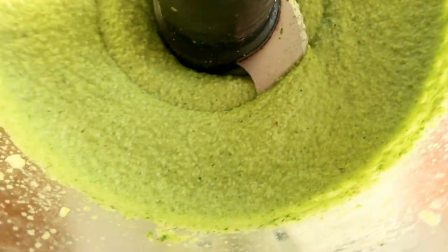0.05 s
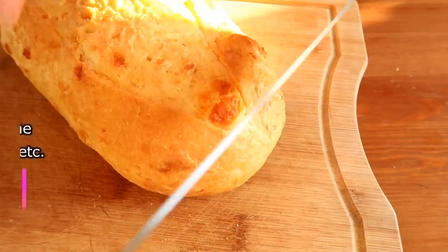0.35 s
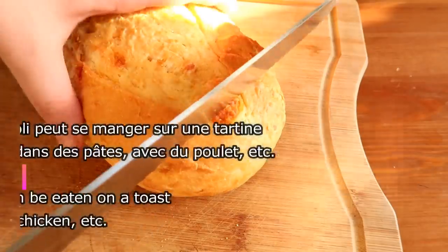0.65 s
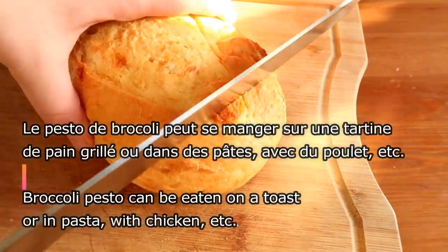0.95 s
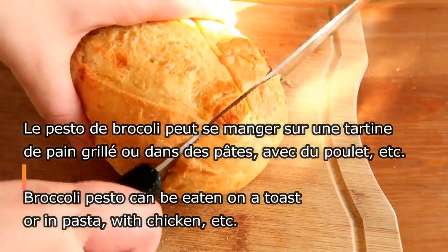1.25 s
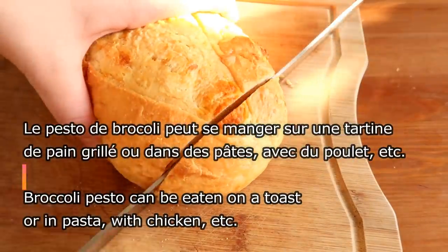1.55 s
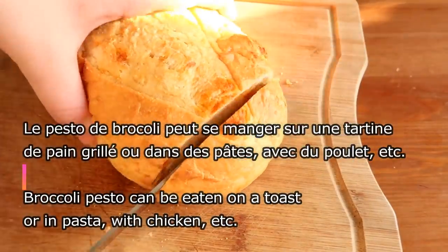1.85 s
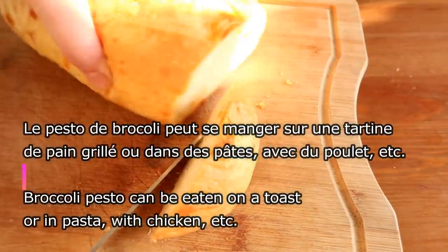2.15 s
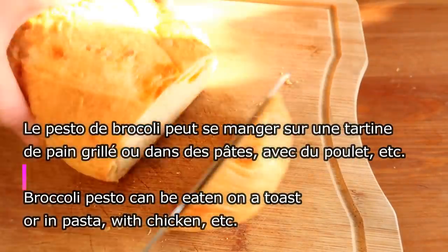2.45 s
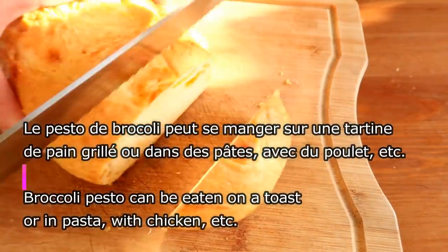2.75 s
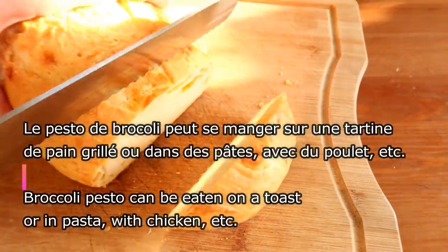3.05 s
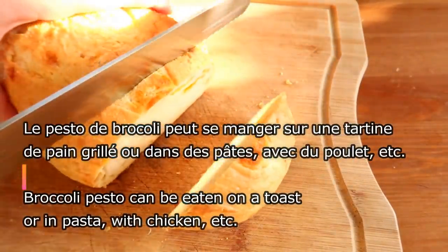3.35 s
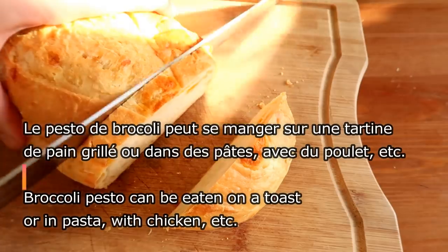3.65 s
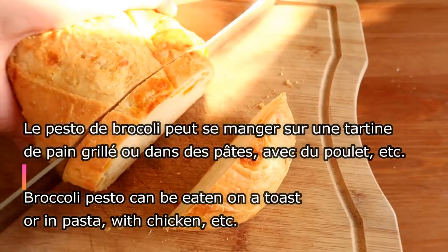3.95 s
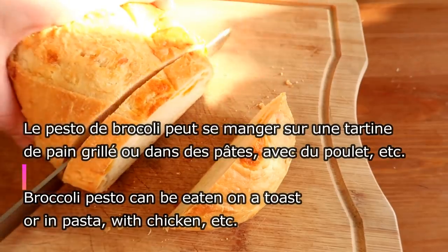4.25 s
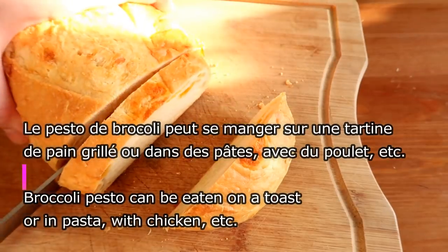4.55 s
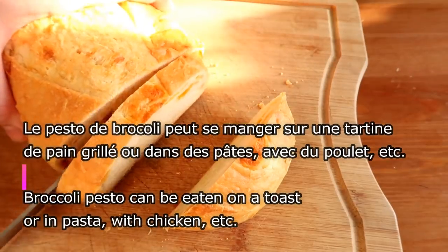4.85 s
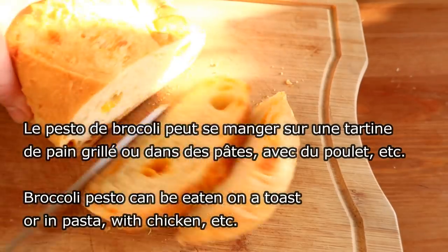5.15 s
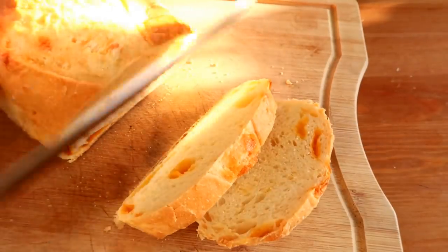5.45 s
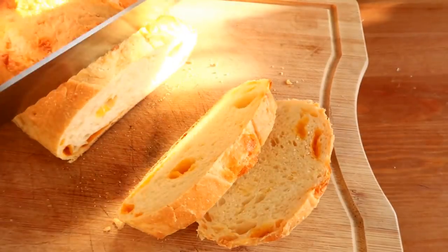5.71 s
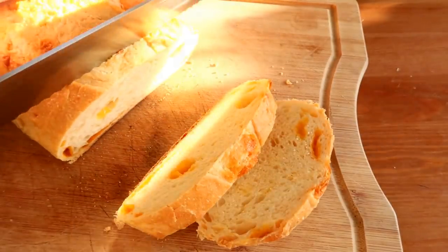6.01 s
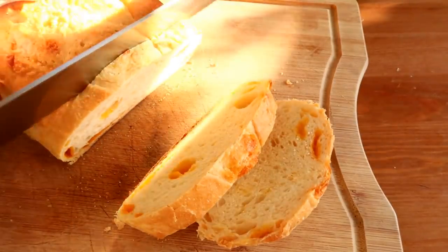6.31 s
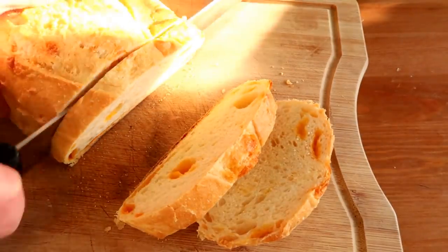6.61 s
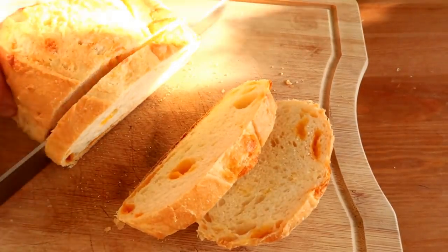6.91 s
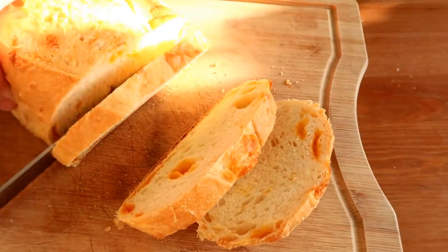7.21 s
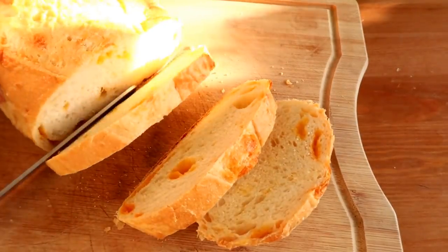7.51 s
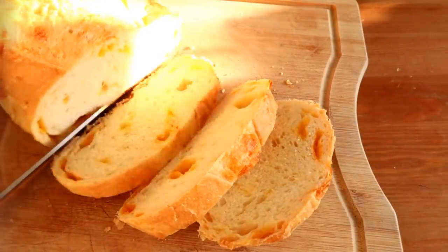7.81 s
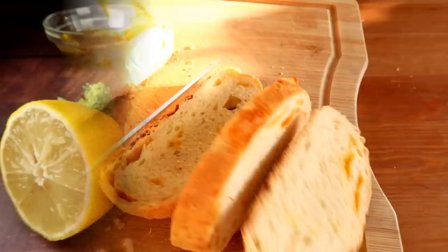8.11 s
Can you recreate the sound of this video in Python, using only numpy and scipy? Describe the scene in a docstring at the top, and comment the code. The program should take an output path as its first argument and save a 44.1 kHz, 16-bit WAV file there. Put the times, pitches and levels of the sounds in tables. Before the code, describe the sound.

A serrated knife cuts three slices from a crusty loaf on a wooden board. Each time the teeth scratch the crust, break through with a juddering crunch and rasp back through the bread, with tiny cracks and dull knocks from the board. Then the slice scrapes softly aside. The microphone is close, in a kitchen with a short echo and a faint hum.

```python
"""Scratching, crunching and rasping: a serrated knife cuts three slices off a crusty loaf on a board.
For each slice the teeth scratch the crust, judder through it on the push and rasp back on the pull,
then the slice is slid aside. Each tooth jolts the loaf and the wooden board and sets off tiny cracks.
A small stereo microphone stands close by; the kitchen rings briefly over a faint hum."""
import sys
import numpy as np
from scipy import signal
from scipy.fft import rfft, irfft, next_fast_len
from scipy.io import wavfile
from scipy.ndimage import uniform_filter1d

SR = 44100
rng = np.random.default_rng(int(sys.argv[2]) if len(sys.argv) > 2 else 0)


def transcribe(signal):
    """Save signal, clipped to [-1, 1], as a 16-bit WAV file at the path in sys.argv[1]."""
    frames = np.atleast_2d(signal).T
    limited = np.clip(frames, -1, 1)
    pcm = np.round(limited * 32767).astype(np.int16)
    wavfile.write(sys.argv[1], SR, pcm)


N = 360297
TIME = np.arange(N) / SR
SIZE = 16384  # samples in an impulse response: the ringing that follows one click
FREQ = np.arange(SIZE // 2 + 1) * SR / SIZE

# The tone of the loaf under a push. Each row: frequency in Hz, level in dB.
PUSH_COLOUR = [(25, -42), (70, -7.5), (130, -1.5), (240, -3), (350, -6), (500, -8), (750, -16), (1000, -19),
               (1600, -24), (2200, -32), (4000, -41), (9000, -52.5), (13000, -59), (15500, -79)]


def undb(db):
    """Turn decibels into a gain to multiply by."""
    return 10 ** (np.asarray(db) / 20)


def unit(x):
    """Scale a signal to an average power of 1."""
    return x / np.sqrt(np.mean(x ** 2))


def colour(points, hz=FREQ):
    """Read the gain at each frequency off a curve of (Hz, dB) points."""
    f, db = np.transpose(points)
    return undb(np.interp(np.log(hz + 1), np.log(f), db))


def swell(s, rise_s, fall_s):
    """The samples that a short swell covers, and its gain on them."""
    span = np.flatnonzero((TIME > s - rise_s) & (TIME < s + fall_s))
    return span, np.interp(TIME[span], [s - rise_s, s, s + fall_s], [0, 1, 0]) ** 2


def response(gain):
    """The ringing after one click, with this gain per frequency and an energy of 1."""
    cepstrum = irfft(np.log(gain / gain.max() + 1e-6))
    cepstrum[1:SIZE // 2] *= 2  # this fold brings the energy as early as it can come
    cepstrum[SIZE // 2 + 1:] = 0
    ringing = irfft(np.exp(rfft(cepstrum)))
    return ringing / np.linalg.norm(ringing)


def ring(x, ringing):
    """Play x through an impulse response."""
    return signal.oaconvolve(x, ringing)[:N]


def walk(rate):
    """A smooth random wobble of size about 1 that changes about rate times a second."""
    size = next_fast_len(N, real=True)
    hz = np.arange(size // 2 + 1) * SR / size
    return unit(irfft(rfft(rng.standard_normal(size)) * np.exp(-(hz / rate) ** 2), size)[:N])


def even(x, seconds):
    """The hand keeps up its pressure: hold the short-term power near 1."""
    power = np.abs(uniform_filter1d(x ** 2, int(seconds * SR) + 1))
    return x / np.sqrt(power + np.mean(x ** 2) / 20)


def room_tone():
    """The background: a low rumble, hiss, a wavering appliance hum and a faint electrical whine."""
    # The tone of the room's noise. Each row: frequency in Hz, level in dB.
    air_colour = [(15, -3), (40, 4.5), (120, 0), (230, 2.5), (400, -1.5), (700, -10.5), (1200, -12),
                  (5900, -25.5), (10000, -34), (12500, -39), (15000, -68)]
    # The notes of the hum. Each row: pitch in Hz, level in dB.
    hum_notes = [(150.7, -60), (328.4, -69.5), (662.1, -71.5)]
    # The background dips briefly. Each row: time in seconds, level in dB.
    dip = [(0, -2), (0.182, -2), (0.19, -40), (0.217, -40), (0.222, 0)]
    hz = np.arange(N // 2 + 1) * SR / N
    mid, side = rfft(rng.standard_normal((2, N))) * colour(air_colour, hz)
    side = side * (hz + 26.4) / (hz + 264)  # left and right share the rumble but not the hiss
    air = irfft(np.array([mid + side, mid - side]), N) / np.std(irfft(mid, N))
    hum = sum(undb(db + 7 * walk(3.5)) * np.sin(2 * np.pi * f * TIME + walk(18)) for f, db in hum_notes)
    whine = undb(-88) * np.sin(2 * np.pi * 13001 * TIME)
    return (air * undb(-50) + hum + whine) * undb(np.interp(TIME, *np.transpose(dip)))


def kitchen(x, low_ring_s=.17, high_ring_s=.26, low_db=-.5, high_db=-1.5, mic_gap_m=.026):
    """The direct sound and a short wash of echoes reach both sides of the microphone."""
    t = np.arange(SIZE) / SR
    echoes = rng.standard_normal((2, SIZE)) * np.clip((t - .002) / .0066, 0, 1)
    lows, highs = (rfft(unit(echoes * undb(-60 * t / ring_s))) / np.sqrt(SIZE)
                   for ring_s in (low_ring_s, high_ring_s))
    treble = FREQ ** 2 / (FREQ ** 2 + 1500 ** 2)
    tail_mid, tail_side = lows * (1 - treble) * undb(low_db) + highs * treble * undb(high_db)
    alike = np.sinc(2 * FREQ * mic_gap_m / 343)  # long waves are the same on both sides
    angle = np.pi * FREQ / SR  # the knife is nearer the left side, by one sample
    mid = np.cos(angle) + tail_mid * np.sqrt((1 + alike) / 2)
    side = 1j * np.sin(angle) + tail_side * np.sqrt((1 - alike) / 2)
    # even out the bass, so the walls lengthen the low notes and leave their tone to the board
    power = uniform_filter1d(np.abs(mid) ** 2 + np.abs(side) ** 2, size=9)
    x = ring(x, response(power ** ((treble - 1) / 2)))
    flight = np.exp(-2j * np.pi * FREQ / SR * 8)  # 8 samples through the air
    return np.array([ring(x, irfft(channel * flight)) for channel in (mid + side, mid - side)])


def moving_echoes(x, stay_s=.09, blend_s=.02, places=4):
    """The point of cutting travels along the blade, so the kitchen's echoes keep changing."""
    place = rng.integers(0, places, 1000)[(TIME / stay_s).astype(int)]
    return sum(kitchen(x * uniform_filter1d(1. * (place == k), int(blend_s * SR) + 1))
               for k in range(places))


def board():
    """Board and table ring at their own notes: their gain per frequency."""
    # Each row: pitch in Hz, width in Hz, strength in dB.
    resonances = [(138, 20, -1), (168, 40, -7.5), (263, 20, -2), (324, 24, -3), (394, 26, -2),
                  (487, 26, -3), (570, 45, -4.5), (703, 26, 1), (760, 20, -4), (912, 30, -2),
                  (1114, 28, -7), (1180, 24, -4), (1300, 30, -8), (1470, 22, -2), (1695, 26, -5),
                  (1750, 22, -8), (1940, 18, -7)]
    peaks = sum(undb(2 * db) * 4 / (1 + (2 * (FREQ - hz) / width) ** 2) for hz, width, db in resonances)
    return np.sqrt(1 + peaks)


def teeth(per_second, scatter_db):
    """Teeth catch at uneven intervals, each with its own force and direction."""
    gap, direction = rng.random((8000, 2)).T
    s = np.cumsum(2 * gap) / per_second
    force = undb(scatter_db * rng.standard_normal(len(s))) * np.sign(direction - .5)
    inside = s < N / SR
    return np.bincount((s[inside] * SR).astype(int), force[inside], N)[:N]


def hits(events, gain, crumble_s=0):
    """Single blows, each peaking at its own level; a crumbling one trails smaller breaks."""
    s, db = np.transpose(events)
    ringing = response(gain)
    t = np.arange(SIZE // 8) / SR
    out = np.zeros(N + 2 * SIZE)
    for start, peak in zip((s * SR).astype(int), undb(db)):
        contact = np.zeros(len(t))
        if crumble_s:
            contact = rng.standard_normal(len(t)) * np.exp(-t / crumble_s)
        contact[0] = 1 + np.linalg.norm(contact)  # the first break is as strong as all that follow
        blow = signal.fftconvolve(ringing, contact)
        out[start:start + len(blow)] += peak * blow / np.abs(blow).max()
    return out[:N]


def resonance(swells, tooth_rate, width_hz, octaves_per_s=0):
    """Uneven catches keep one rough note ringing through each swell; its pitch may glide."""
    damping = signal.butter(2, width_hz / 2, fs=SR, output="sos")
    out = np.zeros(N)
    for s, rise_s, fall_s, hz, db in swells:
        span, gain = swell(s, rise_s, fall_s)
        pitch = hz * 2 ** (octaves_per_s * (TIME[span] - s))
        turn = np.exp(2j * np.pi * np.cumsum(pitch) / SR)
        catches = teeth(tooth_rate, .5)[span]
        tone = np.real(turn * signal.sosfilt(damping, catches / turn))  # keep a band around the pitch
        out[span] += even(tone, .045) * gain * undb(db)
    return out


def bumps():
    """The loaf rocks under the holding hand and bumps the table."""
    # Each row: start in seconds, level in dB.
    thuds = [(0.224, -34), (0.33, -33), (1.59, -21), (3.53, -28), (5.745, -38), (6.279, -27), (6.82, -23.5)]
    # Their dull tone. Each row: frequency in Hz, level in dB.
    tone = [(20, -18), (40, -3), (70, 1), (110, -5), (250, -16), (1000, -66), (8000, -82)]
    return hits(thuds, colour(tone))


def rubbing_notes():
    """Rubbing makes the loaf, the blade and the board ring."""
    # Each row in these tables: peak time, rise and fall in seconds, pitch at the peak in Hz, level in dB.
    hollow = [(1.765, 0.3, 0.49, 372, -20.5), (3.80, 0.09, 0.2, 324, -16), (4.19, 0.15, 0.3, 362, -22.5),
              (6.60, 0.015, 0.11, 505, -21), (6.98, 0.1, 0.53, 356, -20)]  # the half-cut loaf sounds hollow, lower as the blade sinks
    squeaks = [(2.03, .15, 0.11, 2700, -44), (2.08, 0.23, .16, 6750, -51.5),
               (6.95, 0.071, 0.043, 3170, -35.5), (7.06, 0.22, 0.092, 4100, -41.5),
               (7.11, 0.14, 0.091, 2120, -30)]  # the side of the blade sings against the crust
    scrapes = [(4.97, 0.059, 0.045, 664, -27), (4.985, 0.14, 0.044, 340, -28.5),
               (5.145, 0.11, 0.074, 1110, -35), (5.31, 0.08, 0.045, 1160, -38.5),
               (5.35, .06, 0.043, 646, -40), (7.81, 0.12, 0.049, 1160, -35),
               (7.965, 0.056, 0.028, 1120, -36.5)]  # a slice scrapes and catches on the wood
    drags = [(1.01, 0.25, 0.14, 85, -46), (1.545, .08, 0.11, 91, -29.5), (4.71, 0.31, 0.19, 170, -37.5),
             (6.29, 0.25, 0.38, 234, -38), (6.42, .2, .16, 82, -42), (7.22, 0.13, 0.29, 162, -32),
             (7.54, 0.14, 0.061, 145, -38), (7.8, 0.19, 0.27, 143, -34.5)]  # the loaf or a tipping slice drags with a low rumble
    board_notes = [(3.77, 0.078, 0.12, 703, -24), (4.22, 0.24, 0.14, 711, -23.5),
                   (6.945, 0.058, 0.093, 650, -21)]  # the blade presses down and one note of the board stands out
    return (resonance(hollow, tooth_rate=380, width_hz=125, octaves_per_s=-2.8)
            + resonance(squeaks, tooth_rate=900, width_hz=760, octaves_per_s=.3)
            + resonance(scrapes, tooth_rate=500, width_hz=370)
            + resonance(drags, tooth_rate=500, width_hz=94)
            + resonance(board_notes, tooth_rate=440, width_hz=55))


def chatter(wander=.028, flutter_db=2.2):
    """The blade chatters in the tight cut: a friction tone whose pitch and strength waver."""
    # Each row: peak time, rise and fall in seconds, pitch in Hz, level in dB.
    bursts = [(1.635, .13, 0.13, 322, -19), (1.715, .05, 0.092, 408, -20), (1.783, .05, 0.05, 321, -15),
              (1.905, 0.12, 0.035, 282.3, -20.5), (1.958, 0.034, 0.03, 270, -11.5),
              (2.025, 0.033, 0.07, 266.5, -17), (2.11, .06, .05, 272, -24.5)]
    waver, flutter = 1 + wander * walk(80), undb(flutter_db * walk(60))
    out = np.zeros(N)
    for s, rise_s, fall_s, hz, db in bursts:
        span, gain = swell(s, rise_s, fall_s)
        tone = np.sin(2 * np.pi * np.cumsum(hz * waver[span]) / SR) * flutter[span]
        out[span] += unit(tone) * gain * undb(db)
    return out


def squeal(roughness=.035, rough_rate=600, flutter_db=3):
    """The blade sticks and slips on the crust: a tone that rises with speed and drops as it lets go."""
    # Each row: time in seconds, slips per second, level in dB.
    course = [(1.685, 790, -44), (1.715, 820, -36), (1.745, 835, -32), (1.757, 700, -33), (1.78, 660, -42)]
    # Each row: multiple of the slip rate, level in dB.
    overtones = [(3, -2), (4, 0), (5, -1), (6, -4.5), (12, -21)]
    s, hz, db = np.transpose(course)
    span = np.flatnonzero((TIME > s[0]) & (TIME < s[-1]))
    pitch = np.interp(TIME[span], s, hz) * (1 + roughness * walk(rough_rate)[span])
    phase = 2 * np.pi * np.cumsum(pitch) / SR
    tone = unit(sum(undb(part_db) * np.sin(k * phase) for k, part_db in overtones))
    out = np.zeros(N)
    out[span] = tone * undb(np.interp(TIME[span], s, db) + flutter_db * walk(rough_rate)[span])
    return out


def breaking_crust():
    """The biggest flakes snap off, and whole patches of crust cave in with a crunch."""
    # Each row: start in seconds, level in dB.
    snaps = [(0.9931, -41), (1.042, -35), (1.0809, -39), (1.1508, -24.5), (1.1775, -21), (1.183, -19.5),
             (1.2181, -17), (1.2427, -22), (1.257, -24), (1.273, -25), (1.5823, -28), (1.8467, -26),
             (2.0472, -33), (2.3855, -39), (2.4588, -28), (2.8614, -41), (3.4949, -40), (3.5368, -37),
             (3.6192, -39), (3.7344, -28), (3.7444, -32), (4.0626, -27), (4.0871, -27), (4.2298, -23.5),
             (4.9377, -37), (5.002, -30), (5.2245, -39), (5.2634, -35), (6.2656, -38), (6.2996, -38),
             (6.4168, -41), (6.4492, -38), (6.4811, -30), (6.5749, -34), (6.5966, -20), (8.066, -43)]
    crunches = [(1.184, -16), (1.218, -17), (1.603, -14), (3.743, -26), (4.527, -28), (6.589, -21),
                (6.606, -18), (6.624, -22), (8.068, -24)]
    # Their tones. Each row: frequency in Hz, level in dB.
    snap_tone = [(300, -35), (1200, 1), (2800, 10.5), (5000, 5), (10000, 0), (15000, -13)]
    crunch_tone = [(400, -15), (1100, -5), (1700, 1), (2500, 0.5), (3500, -17), (6000, -22), (10000, -25),
                   (15000, -51)]
    return (hits(snaps, colour(snap_tone), crumble_s=.0019)
            + hits(crunches, colour(crunch_tone), crumble_s=.0049))


def jolts():
    """The blade lurches and the soft loaf cushions it; harder pressing gives a deeper knock."""
    # Each row: start in seconds, level in dB, low and top edge of the knock in Hz.
    knocks = [(1.184, -2.5, 49.3, 1300), (1.218, -6, 70, 2000), (1.272, -6.5, 50, 1190),
              (1.322, -15, 149, 1387), (1.586, -8, 250, 2000), (1.645, -12, 220, 1400),
              (1.705, -9.5, 302, 1400), (1.773, -2, 303, 1300), (3.731, -7, 120, 1010),
              (3.746, -2, 40.2, 650), (3.879, -22, 180, 600), (4.021, -16, 260, 900),
              (4.077, -11, 99, 1100), (4.122, -9.5, 260, 1100), (4.153, -8.5, 260, 900),
              (4.678, -35, 300, 1400), (4.715, -26, 160, 900), (4.965, -16, 300, 1500),
              (5.003, -16, 250, 1400), (5.324, -27, 600, 2000), (6.59, -5.5, 45, 1000),
              (6.608, -3.5, 59.6, 1090), (6.628, -10, 60.3, 1010), (6.903, -7.5, 200, 1200),
              (6.933, -10, 222, 1200), (7.734, -27.5, 200, 1400)]
    tone = colour(PUSH_COLOUR) * board()
    out = np.zeros(N)
    for s, db, low_hz, top_hz in knocks:
        band = FREQ ** 3 / (FREQ ** 3 + low_hz ** 3) / (1 + (FREQ / top_hz) ** 4)
        out += hits([(s, db)], tone * band, crumble_s=.0066)
    return out


def flakes(top_hz, per_second, ring_s, cluster_rate, scatter_db=2.2, cluster_db=2):
    """Flakes of crust break off in clusters; each rings for a moment at its own pitch."""
    when, pitch, length, phase, force = rng.random((int(per_second * N / SR), 5)).T
    start = (when * N).astype(int)
    t = np.arange(SIZE // 32) / SR
    size = undb(-scatter_db * np.log(1 - force) + cluster_db * walk(cluster_rate)[start])
    decay = np.exp(-t / (ring_s * (.5 + length[:, None])))
    pings = size[:, None] * decay * np.sin(2 * np.pi * (top_hz * pitch[:, None] * t + phase[:, None]))
    samples = start[:, None] + np.arange(len(t))
    sound = np.bincount(samples.ravel(), pings.ravel(), N)[:N]
    return even(sound, .02) * np.sqrt(2 * top_hz / SR)


def fractures(catches, burst_s, per_second, scatter_db, rub):
    """Tiny cracks, strongest just after each catch; rub adds a steady share between catches."""
    burst = unit(signal.lfilter([1], [1, -np.exp(-1 / (burst_s * SR))], np.abs(catches)))
    cracks = (rng.random(N) < per_second / SR) * rng.standard_normal(N)
    size = undb(scatter_db * np.minimum(rng.exponential(size=N), 5))
    return cracks * size * (rub + burst)


def envelope(s, attack_s, hold_s, release_s, lean_db_per_s, fade):
    """A stroke gains 20 dB over its attack, leans while held, and loses fade * 20 dB per release."""
    db = lean_db_per_s * np.clip(TIME - s, 0, hold_s)
    db -= 20 * (np.maximum(s - TIME, 0) / attack_s + fade * np.maximum(TIME - s - hold_s, 0) / release_s)
    return np.where(db > -60, undb(db), 0)


def strokes(rows, tone, flaking, chipping, flake_share, chip_share, tooth_rate, tooth_db,
            rub, patchy_db, crack_rate, crack_db, lean_db_per_s):
    """Teeth shake the board (body), crumb tears and flakes ring (rasp), and the crust cracks (crackle)."""
    catches = teeth(tooth_rate, tooth_db)
    tearing = unit(fractures(catches, burst_s=.0028, per_second=12000, scatter_db=1.3, rub=rub))
    patches = unit(undb(patchy_db * walk(45)))  # the crust is harder in some places
    body = even(unit(catches) + .81 * tearing, .015)
    crumb = even(.5 * unit(catches) + tearing, .018)
    rasp = (np.sqrt(1 - flake_share) * crumb + np.sqrt(flake_share) * flaking) * patches
    cracks = even(fractures(catches, .0085, crack_rate, crack_db, rub), .046)
    crackle = (np.sqrt(1 - chip_share) * cracks + np.sqrt(chip_share) * chipping) * patches
    # bands, fades and leans each list body, rasp and crackle in that order
    low, high = (1 / (1 + (FREQ / edge_hz) ** 8) for edge_hz in (700, 3000))
    bands = (low, np.abs(high - low), 1 - high)
    fades = (.98, 1.11, 1.08)  # the rasp and crackle die away a little sooner than the low body
    shape = colour(tone) * board()
    out = np.zeros(N)
    for k, layer in enumerate((body, rasp, crackle)):
        power = sum((undb(db[k]) * envelope(s, attack, hold, release, lean_db_per_s[k], fades[k])) ** 2
                    for s, attack, hold, release, *db in rows)
        out += ring(layer * np.sqrt(power), response(shape * np.sqrt(bands[k])))
    return out


def sawing():
    """The knife works through the loaf with four kinds of stroke."""
    # Each row: time of full force, attack, hold and release in seconds, then body, rasp, crackle in dB.
    scratches = [(0.75, 0.022, 0.046, 0.11, -68, -57, -67.5), (1.125, 0.19, 0.042, 0.026, -28, -37, -46.5),
                 (3.475, 0.042, 0.017, 0.048, -64, -55, -57.5), (3.60, 0.18, 0.14, .03, -32.5, -40, -50),
                 (6.50, 0.29, 0.06, 0.031, -35, -38, -46)]  # the teeth scratch harder and harder until they bite
    pushes = [(1.186, 0.0067, 0.1, 0.09, -14, -19.5, -43.5), (3.733, 0.0064, 0.11, 0.078, -19, -29, -46.5),
              (6.591, 0.0094, 0.041, .11, -14.5, -25.5, -48)]  # the blade breaks through at once, then slows to a stop
    pulls = [(1.578, 0.098, .2, 0.16, -20.5, -23.5, -39.5), (1.73, 0.08, 0.1, 0.11, -36, -32, -44.5),
             (1.92, 0.63, 0.2, 0.14, -27, -32, -44.5), (2.15, 0.15, 0.0049, 0.075, -23.5, -28.5, -41.5),
             (3.99, 0.078, 0.053, 0.044, -58, -48, -54), (4.09, 0.09, 0.23, 0.43, -17, -33, -43),
             (4.48, 0.19, 0.087, 0.085, -39, -40.5, -57), (4.715, 0.083, 0.014, 0.057, -38, -40, -60),
             (6.80, 0.043, 0.084, .05, -37.5, -41.5, -49.5), (6.91, 0.036, 0.1, 0.097, -17.5, -26.5, -39.5),
             (7.05, 0.19, 0.059, 0.19, -21, -20, -37.5), (7.49, 0.032, 0.047, 0.067, -51, -54, -70)]  # it is drawn back through the slice, and lightly to finish the bottom crust
    slides = [(2.335, 0.15, 0.026, 0.12, -33, -38, -50), (2.39, 0.03, 0.16, 0.034, -38, -29.5, -41.5),
              (2.815, 0.055, 0.0072, 0.068, -43, -45, -57), (4.87, 0.086, 0.083, .05, -37.5, -48, -63),
              (4.938, 0.029, 0.061, 0.098, -32.5, -31.5, -44.5),
              (5.13, 0.086, 0.023, 0.084, -33.5, -39.5, -56), (5.215, 0.024, 0.12, 0.081, -41, -36, -47.5),
              (7.693, .01, 0.054, .05, -49, -52, -69), (7.78, 0.13, 0.043, 0.068, -35.5, -41.5, -56),
              (7.94, 0.13, 0.034, 0.058, -40.5, -44.5, -67), (8.07, 0.12, 0.1, .1, -43, -39, -51)]  # it shoves the freed slice over the board, or brushes the loaf
    # The tone of each kind. Each row: frequency in Hz, level in dB.
    scratch_tone = [(25, -11), (72, 8), (130, -4.5), (270, 2), (380, -5), (1000, -8.5), (1800, -15),
                    (4200, -23.5), (10000, -37), (15500, -49)]
    pull_tone = [(25, -58), (60, -12), (100, -14), (180, -2), (340, -3), (720, -8), (1000, -9),
                 (1500, -14.5), (2700, -22.5), (5000, -33.5), (11000, -45), (15500, -57)]
    slide_tone = [(25, -31), (80, -1.5), (160, 2), (270, 0.5), (400, -2.5), (650, -3), (900, -7),
                  (1200, -1), (1800, -8.5), (5000, -21), (9500, -33), (14000, -49)]
    flaking = flakes(top_hz=5000, per_second=1200, ring_s=.003, cluster_rate=45)
    chipping = flakes(top_hz=13500, per_second=1300, ring_s=.002, cluster_rate=90)
    out = strokes(scratches, scratch_tone, flaking, chipping, flake_share=.35, chip_share=.15,
                  tooth_rate=270, tooth_db=2, rub=.4, patchy_db=1.7,
                  crack_rate=2400, crack_db=2.4, lean_db_per_s=(-5, 8, -5))
    out += strokes(pushes, PUSH_COLOUR, flaking, chipping, flake_share=.45, chip_share=.2,
                   tooth_rate=260, tooth_db=1.5, rub=.5, patchy_db=.5,
                   crack_rate=3300, crack_db=1.5, lean_db_per_s=(-25, -65, -30))
    out += strokes(pulls, pull_tone, flaking, chipping, flake_share=.6, chip_share=.55,
                   tooth_rate=310, tooth_db=2.3, rub=.55, patchy_db=1,
                   crack_rate=5000, crack_db=2.3, lean_db_per_s=(-29.5, 9, -20))
    out += strokes(slides, slide_tone, flaking, chipping, flake_share=.4, chip_share=.55,
                   tooth_rate=520, tooth_db=1.6, rub=1, patchy_db=.6,
                   crack_rate=7000, crack_db=1.8, lean_db_per_s=(2, -49, -49))
    return out


def scene():
    """All the sounds of cutting ring in the kitchen, over its quiet background."""
    cutting = sawing() + jolts() + breaking_crust() + bumps() + chatter() + squeal() + rubbing_notes()
    return moving_echoes(cutting) + room_tone()


def record(dry):
    """The recorder clips peaks just under full scale and cuts the treble above 15100 Hz."""
    treble_cut = signal.ellip(8, .2, 80, 15100, fs=SR, output="sos")
    return signal.sosfilt(treble_cut, np.clip(dry, -.95, .95))


dry = scene()
out = record(dry)
transcribe(out)
```